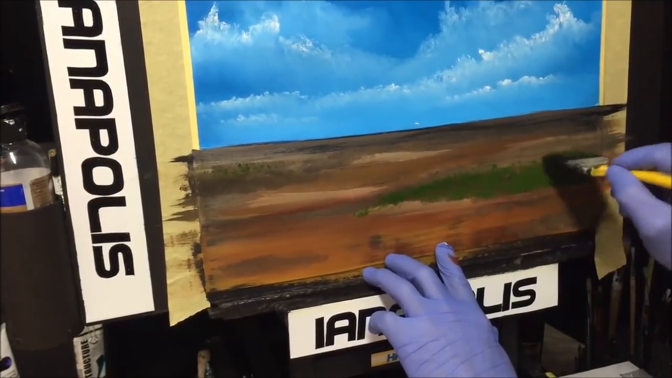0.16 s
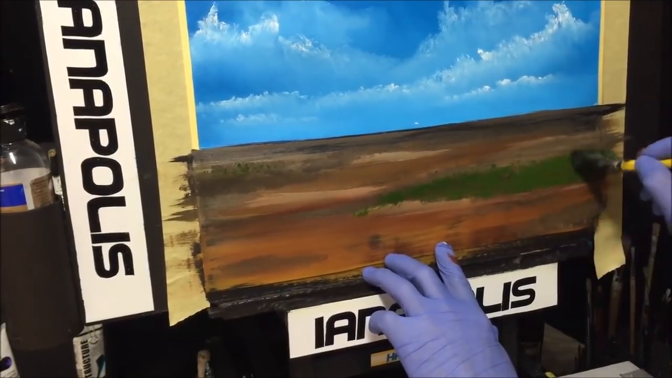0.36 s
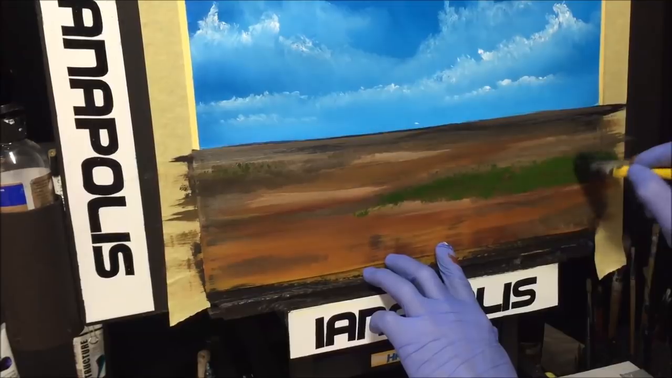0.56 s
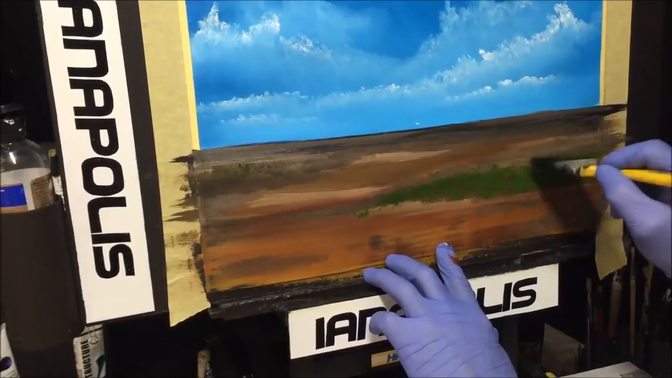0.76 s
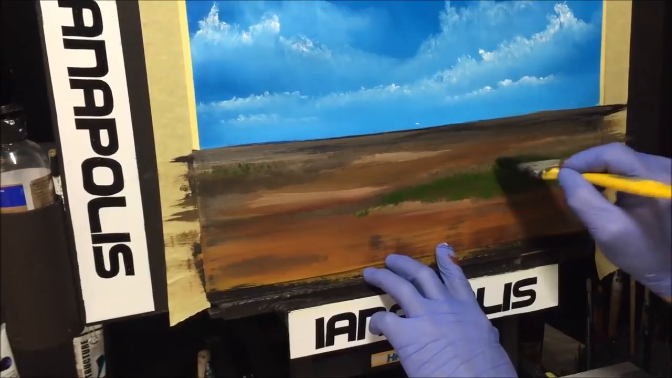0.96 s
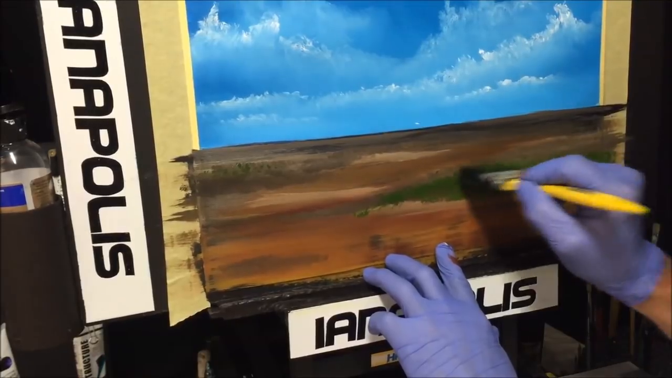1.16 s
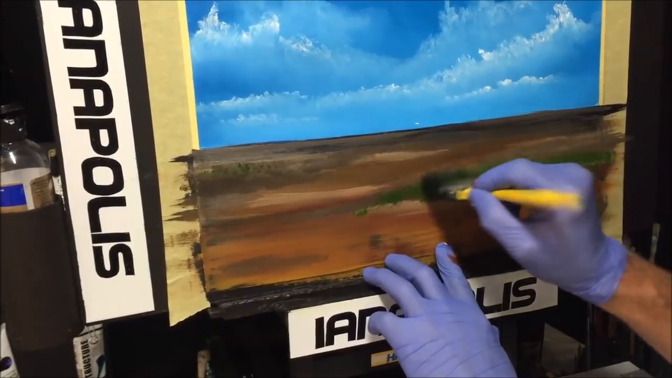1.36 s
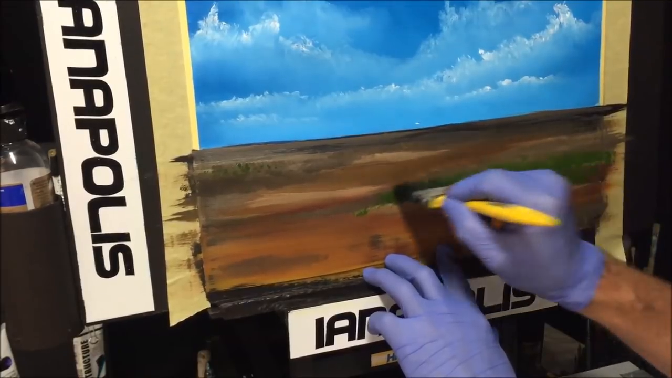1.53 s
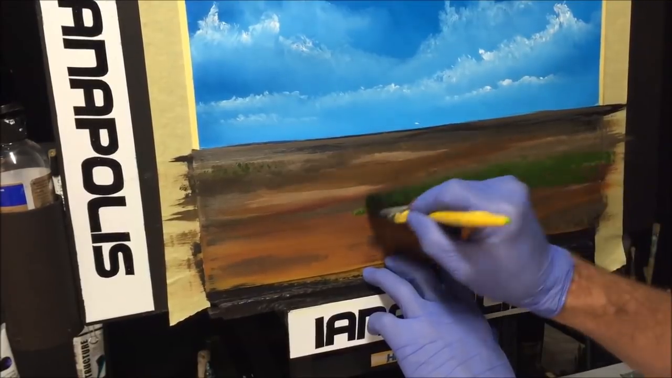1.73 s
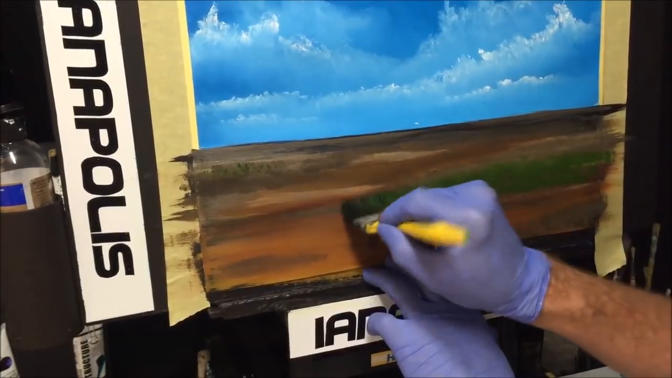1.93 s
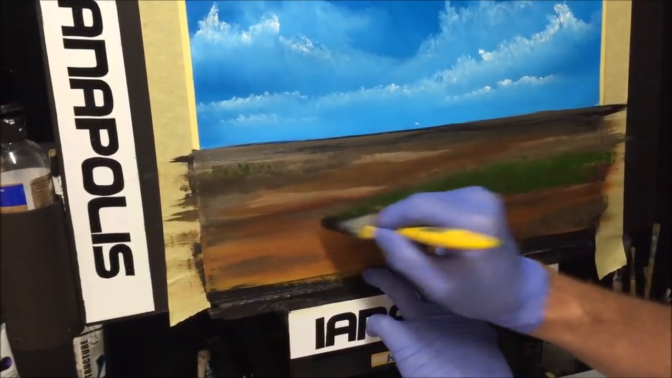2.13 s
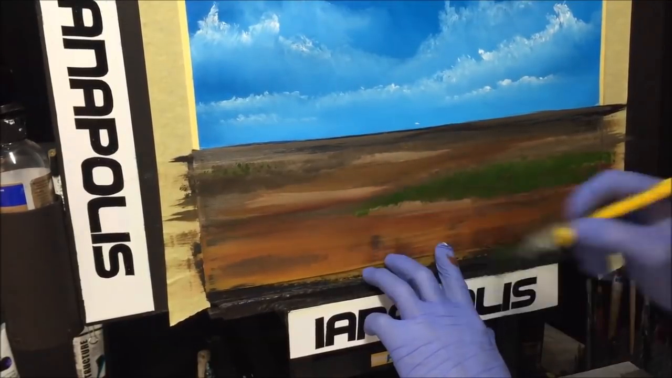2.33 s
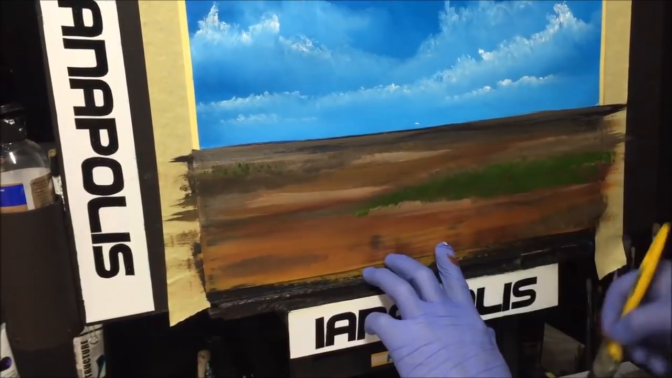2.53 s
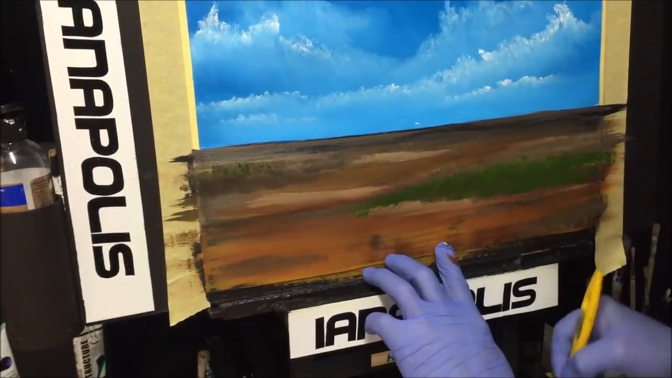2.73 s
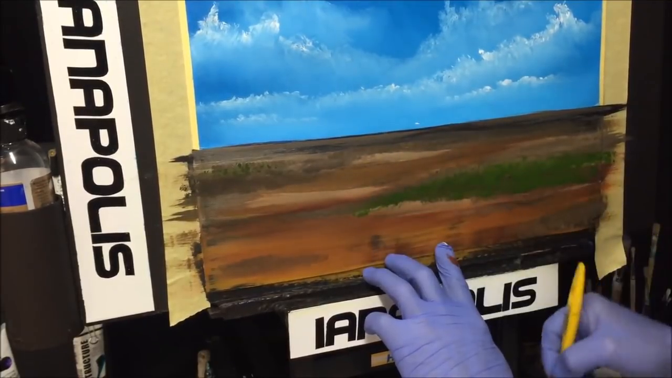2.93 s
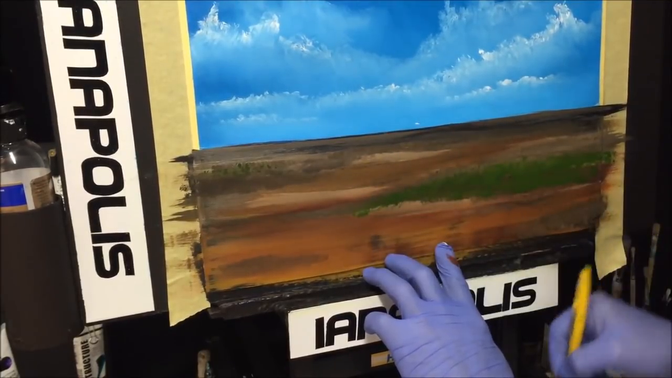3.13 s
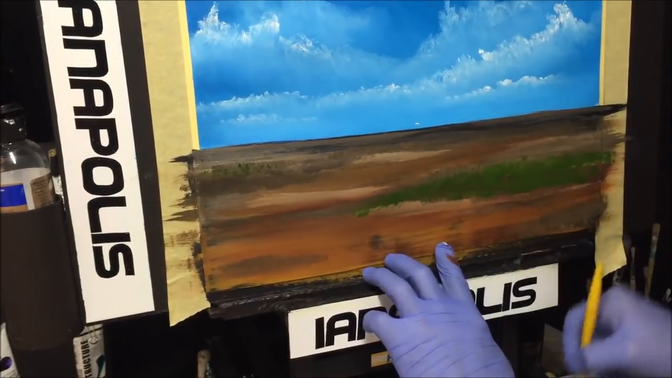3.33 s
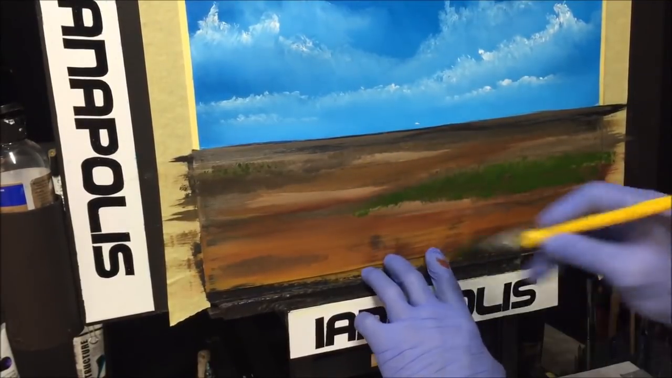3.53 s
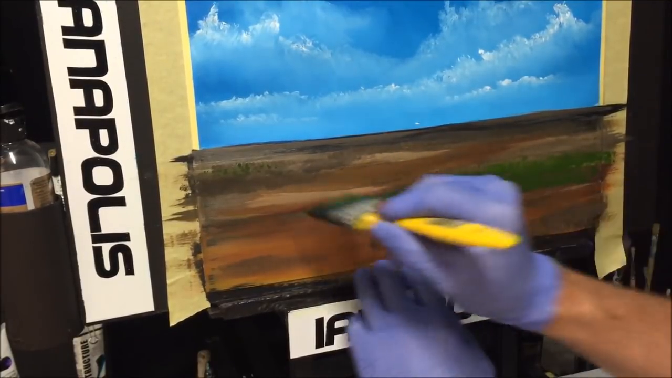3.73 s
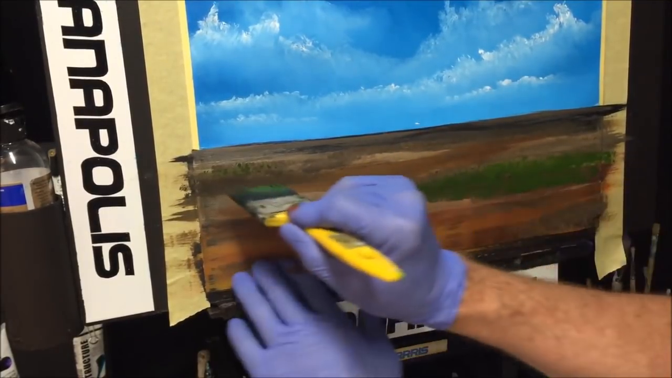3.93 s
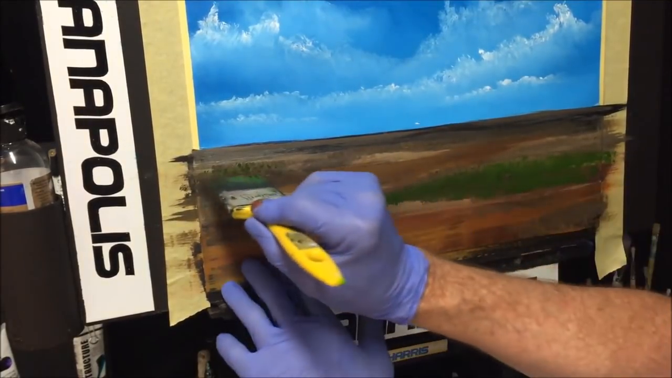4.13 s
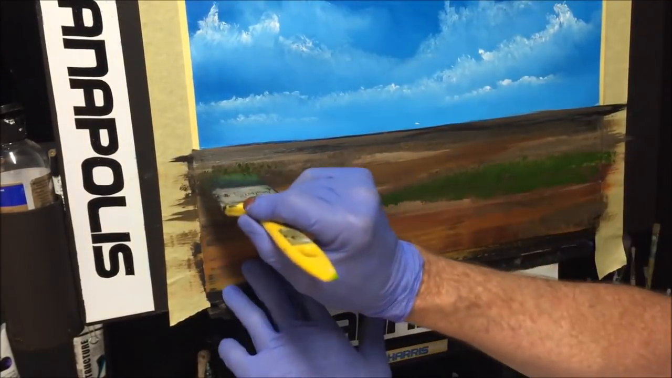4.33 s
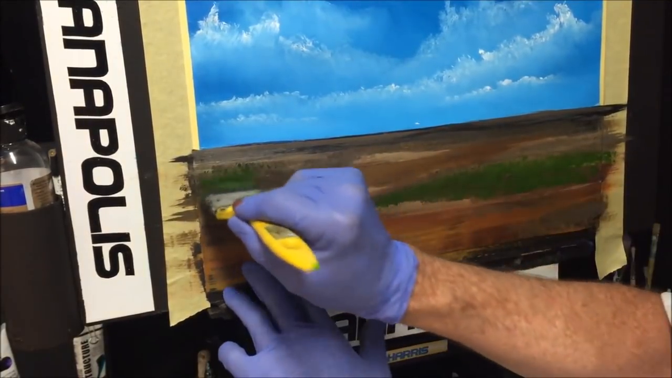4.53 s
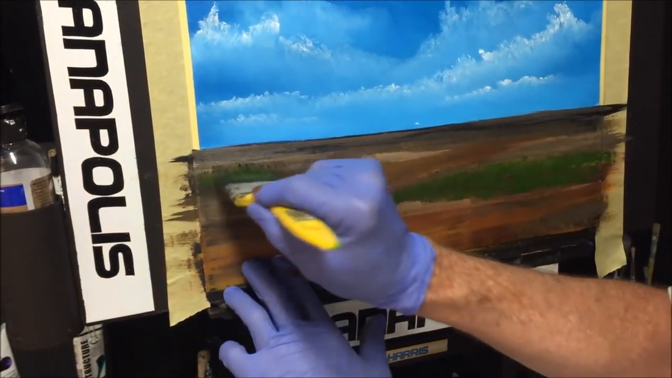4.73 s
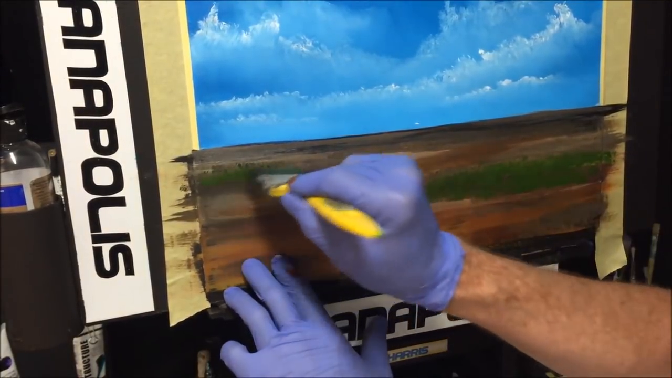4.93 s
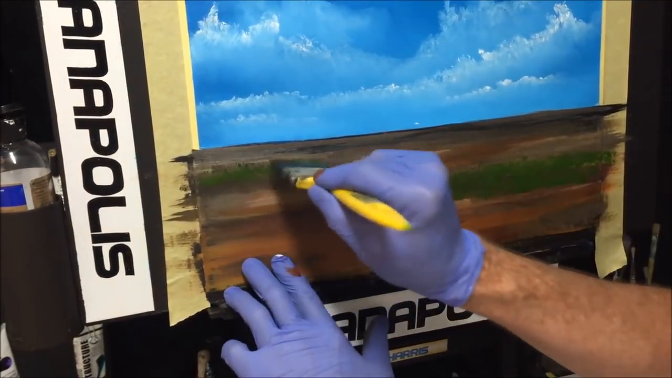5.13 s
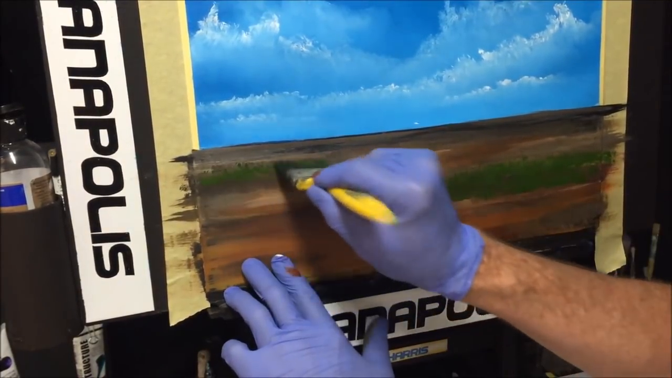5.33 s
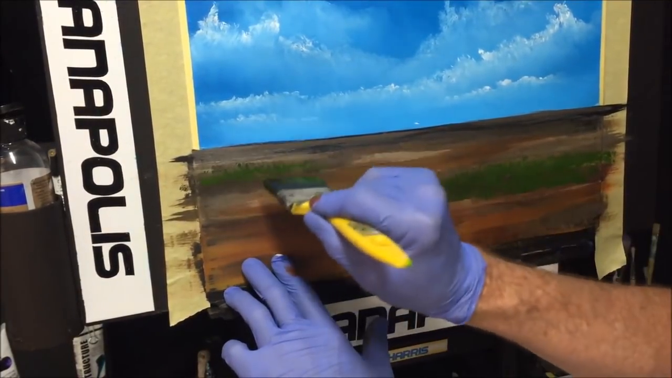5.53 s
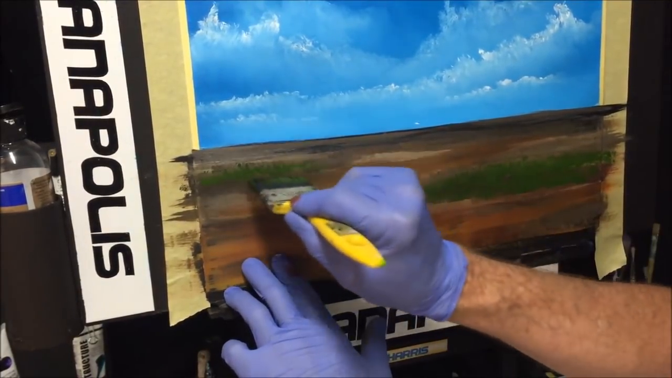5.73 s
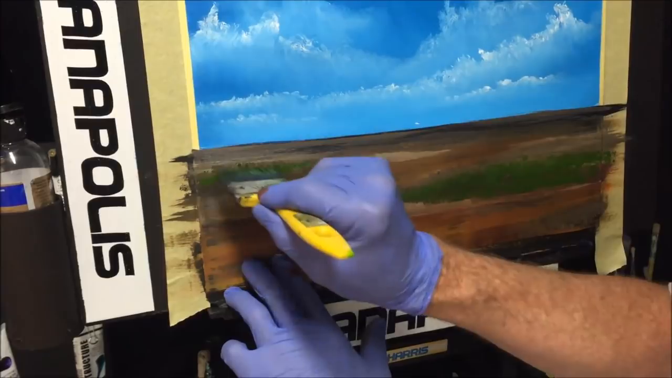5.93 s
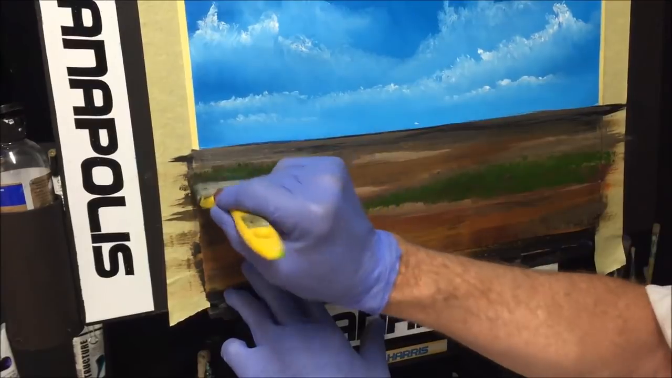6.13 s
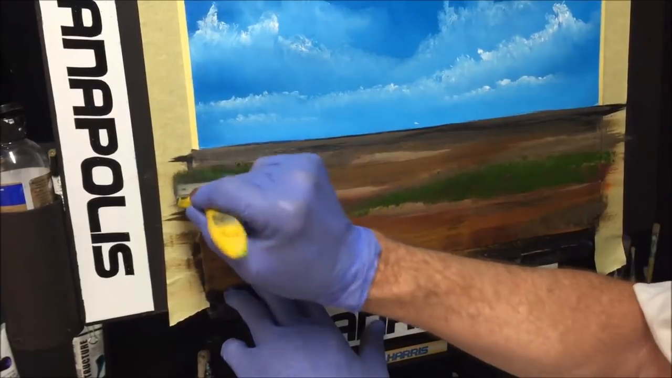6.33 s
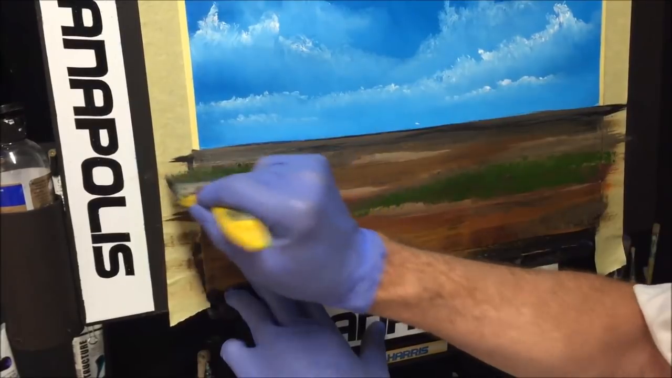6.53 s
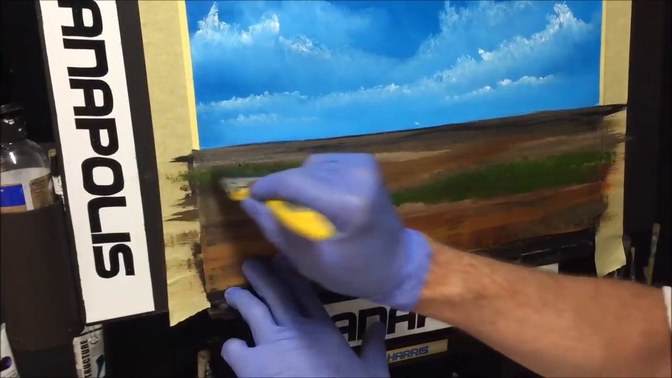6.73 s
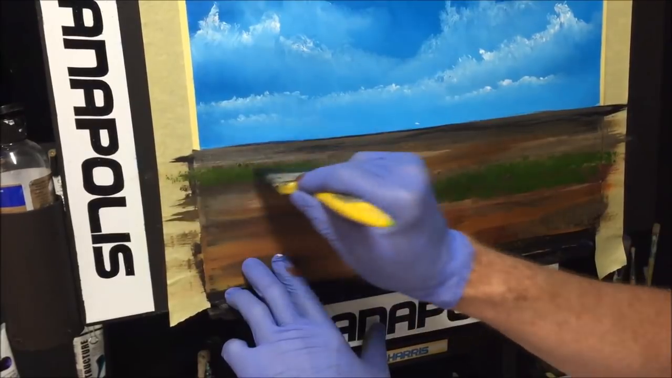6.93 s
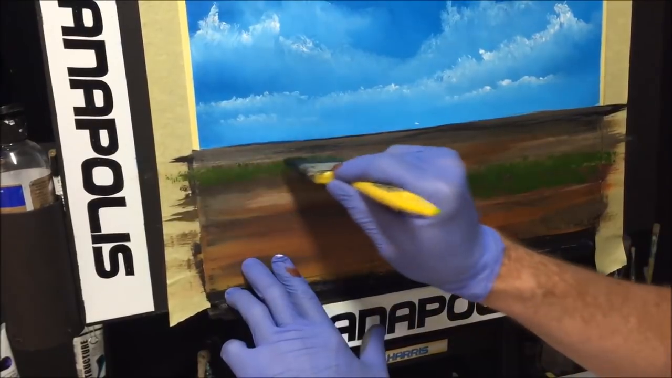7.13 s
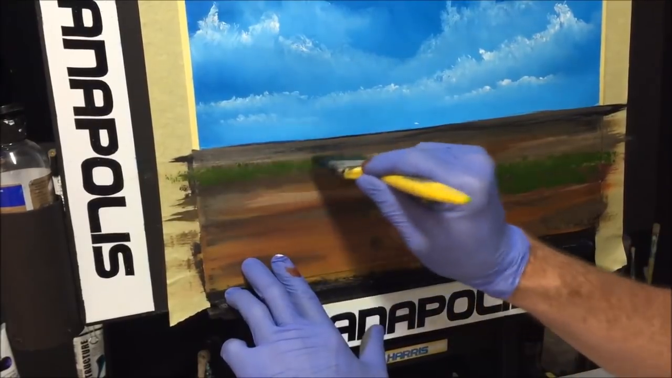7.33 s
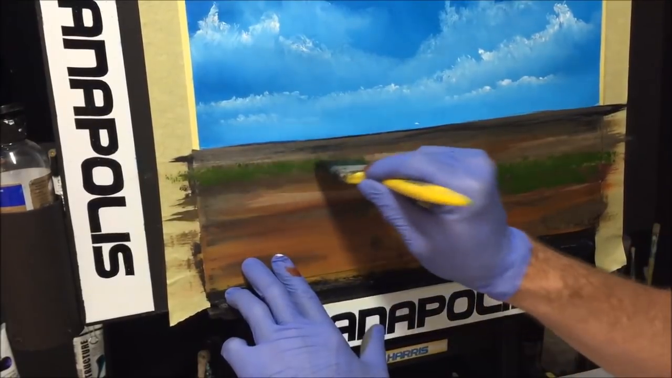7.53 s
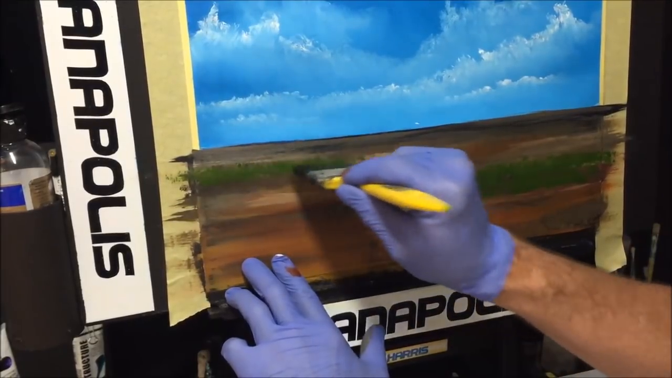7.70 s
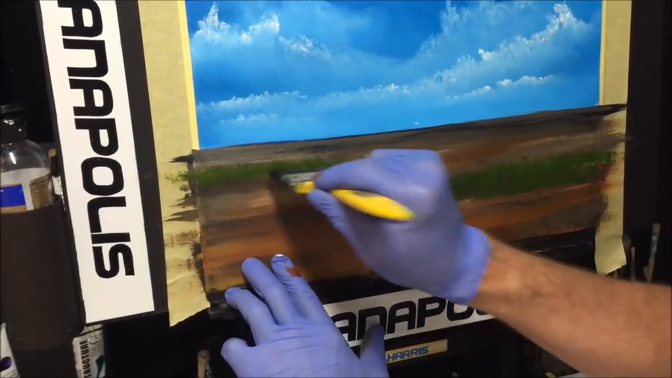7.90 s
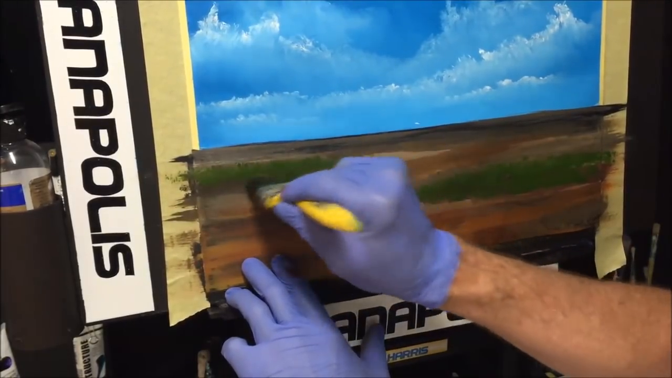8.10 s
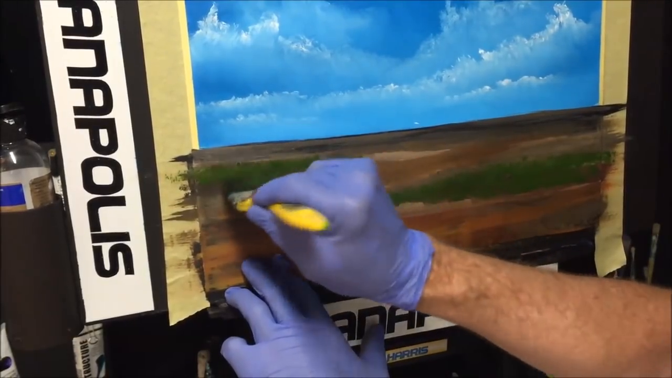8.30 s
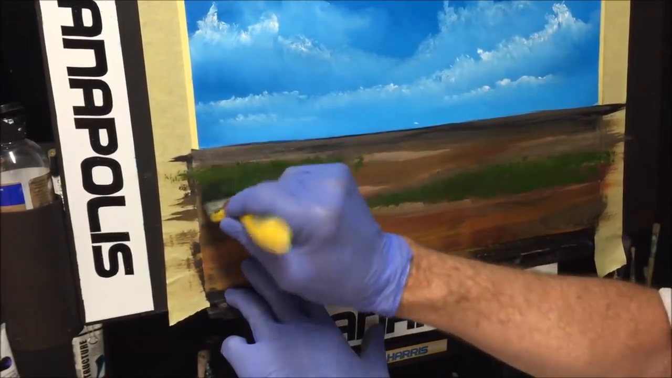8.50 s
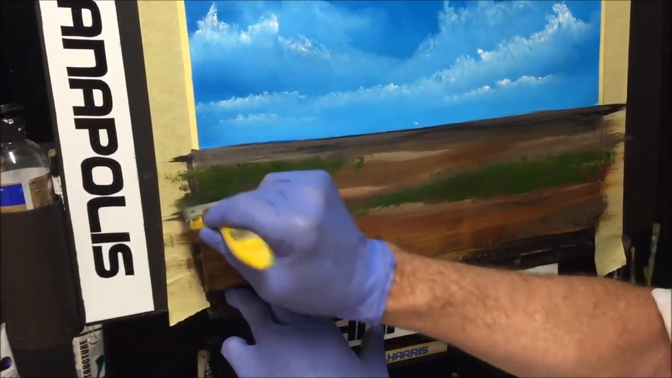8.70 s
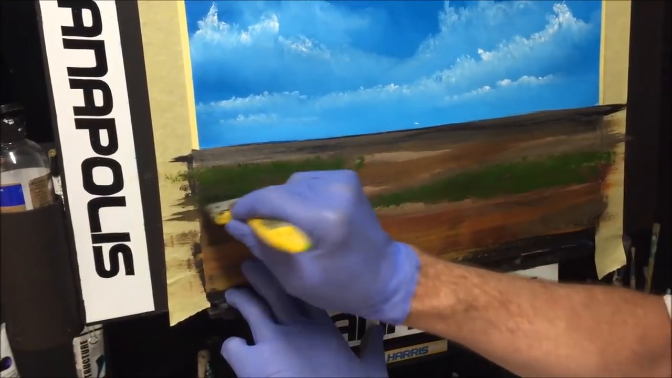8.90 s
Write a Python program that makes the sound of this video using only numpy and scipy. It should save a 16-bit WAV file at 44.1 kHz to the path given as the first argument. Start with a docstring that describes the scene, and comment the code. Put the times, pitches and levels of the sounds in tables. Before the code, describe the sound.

A stiff bristle brush stabs wet paint onto a stretched canvas nearly six times a second, each tap a soft thump with a scratchy crunch. The tapping stops for four increasingly loud dabs on a palette and a faint slide of a rubber glove. A longer run of stabs follows, with one short pause. It is all close to the microphone in a small studio, with scattered ticks and a faint low hum.

```python
"""A stiff bristle brush stabs paint onto a stretched canvas, close by in a small studio, nearly six
times a second. In each stab the tips scratch, the tuft buckles and thumps the cloth, then peels out
of the wet paint. Next, four dabs on the palette reload the brush and a gloved hand slides along the
canvas. Then a longer run of stabs follows, with one short pause; late in it the easel rocks once.
The brush ticks and clicks here and there, and faint air and a low hum lie under it all."""
import sys
import numpy as np
from scipy import signal
from scipy.fft import rfft, irfft, next_fast_len
from scipy.io import wavfile
from scipy.ndimage import uniform_filter1d

SR = 44100
rng = np.random.default_rng(int(sys.argv[2]) if len(sys.argv) > 2 else 0)


def digitize_waveform(pressure):
    """Quantize a signal to 16-bit integers and store it at the path in sys.argv[1].

    Rows of a 2-D input are taken as channels; values are limited to [-1, 1].
    """
    field = np.atleast_2d(pressure).T
    bounded = np.clip(field, -1, 1)
    quanta = np.round(bounded * 32767).astype(np.int16)
    wavfile.write(sys.argv[1], SR, quanta)


N = 399546
TIME = np.arange(N) / SR

# Levels in all tables are relative: each source adds its own gain.
# stabs on the canvas: start_s, thump_db, crunch_db
STABS = [(0.133, -27.5, -39.5), (0.3042, -24, -38), (0.4663, -31.5, -37.5), (0.6268, -36, -36.5),
         (0.797, -29, -37), (0.97, -32, -40), (1.135, -31.5, -37), (1.3094, -29.5, -39),
         (1.4859, -31.5, -41), (1.667, -30.5, -39.5), (1.8433, -38, -39.5), (2.0142, -34.5, -37),
         (2.18, -38, -31), (4.5546, -31.5, -28), (4.7653, -36, -35), (4.9402, -26.5, -34.5),
         (5.1257, -23, -31.5), (5.3, -23.5, -26.5), (5.467, -24, -30), (6.1981, -29.5, -29),
         (6.4017, -26.5, -31), (6.583, -28, -33.5), (6.7833, -24, -30), (6.9671, -22, -31),
         (7.1513, -26.5, -31), (7.3334, -27.5, -35), (7.51, -28, -33), (7.6878, -28.5, -32),
         (7.867, -31.5, -34), (8.058, -24, -29.5), (8.2332, -27, -28.5), (8.4109, -32, -30),
         (8.5862, -32, -29.5), (8.76, -32, -32.5), (8.9596, -29.5, -31)]
# dabs on the palette: start_s, time_in_paint_s, thump_db, crunch_db, peel_db
DABS = [(2.8107, 0.1, -34, -40.5, -50), (3.0214, 0.083, -24, -36, -50.5),
        (3.2137, 0.076, -21.5, -33, -50.5), (3.3945, 0.074, -18.5, -25.5, -52.5)]
# tone of bristles scraping the weave: pitch_hz, level_db
SCRATCH_TONE = [(500, 8), (1100, -13.5), (1500, 4.5), (2000, -1), (2700, -0.5), (3800, -16), (6500, -17.5),
                (15000, -35)]
# bright hiss of the palette paint and of the ticks: pitch_hz, level_db
HISS_TONE = [(600, -4), (2000, -4), (4500, 1), (8000, 0), (12000, -2), (15500, -2.5)]


def canvas_thumps(cloth_db, easel_db):
    """The cloth drums briefly at a pitch set by the spot that is hit; frame and easel ring on."""
    # the cloth's ringing notes: pitch_ratio, hit_at_right_db, hit_at_left_db, ring_s
    cloth_notes = [(0.599, -34, -10, 0.035), (1.002, -5.5, -3, 0.038), (1.122, -3, 1.5, 0.019),
                   (1.43, -8.5, -4, 0.026), (1.847, -6, -10.5, 0.033), (2.1, -29, -25, 0.0085),
                   (2.9, -18, -10.5, 0.024), (3.6, -16.5, -13, 0.018)]
    # low notes of frame and easel: pitch_hz, level_db, ring_s
    easel_notes = [(70.77, -26.5, 0.87), (83.3, -27.5, 0.65), (109.8, -31, 0.72), (155.5, -27.5, 0.33),
                   (222.6, -23, 0.28), (275.2, -12.5, 0.083), (350, -12.5, 0.1), (382.2, -21.5, 0.17)]
    right_hz, left_hz = 281.7, 357
    ratio, right_db, left_db, ring_s = np.transpose(cloth_notes)
    out = np.zeros(N)
    for start, thump_db, _ in STABS:
        left = place(start)
        pitch = np.interp(left, [0, 0.774], [right_hz, left_hz])  # levels off near the left edge
        hardness_db = .5 * (thump_db + 26) * np.log2(ratio)  # a harder stab favours higher notes
        notes_db = right_db + left * (left_db - right_db) + hardness_db
        cloth = strike(pitch * ratio, notes_db, ring_s, contact_s=.0012, vary_db=.8, detune=.006)
        easel = strike(*np.transpose(easel_notes), contact_s=0.014, vary_db=2.0, detune=0.025)
        push_db = 0.38 * thump_db - 2 * left  # varies less than the thump; weaker on the left
        add(out, start, from_db(thump_db + cloth_db) * cloth)
        add(out, start, from_db(push_db + easel_db) * easel)
    return out


def tips():
    """The tips land first and chirp as they stick and slip, then skid until the tuft buckles."""
    lead_s, upright_hz, slanted_hz = 0.017, 2730, 1566
    starts = np.transpose(STABS)[0]
    lean = slant(starts)
    touches = starts - lead_s * lean
    pitches = upright_hz * (slanted_hz / upright_hz) ** lean
    levels_db = -32.5 - 99 * (place(starts) - 0.44) ** 2  # loudest mid-canvas
    out, t = np.zeros(N), np.arange(SR // 30) / SR
    envelope = t / 0.0016 * np.exp(1 - t / 0.0023)
    for touch, pitch, db in zip(touches, pitches, levels_db):
        wobble = rms_one(uniform_filter1d(rng.standard_normal(len(t)), size=24))
        hz = pitch * (1 + 0.19 * wobble)
        add(out, touch, from_db(db) * envelope * np.sin(2 * np.pi * np.cumsum(hz) / SR))
    skid = holds(touches, starts, -54 + 15 * lean, edge_s=0.00071)
    return out + skid * grains(SCRATCH_TONE, spread_db=9.0)


def canvas_bristles():
    """The tuft buckles with a crunch, rustles while pressed and lets go of the paint."""
    # tones of the crunch at each edge and of the sticky paint: pitch_hz, level_db
    right_tone = [(400, -18), (1000, -12.5), (1600, 2), (2600, 3), (3800, -1), (5000, -6), (6400, -10),
                  (9000, -13.5), (15000, -29)]
    left_tone = [(400, 8.5), (1000, -5.5), (1500, -4), (2000, -12.5), (2900, -5), (5000, -16), (6300, -14),
                 (8000, -21.5), (9500, -19.5), (11000, -25.5), (15500, -26.5)]
    paint_tone = [(600, -14.5), (1100, 3.5), (1800, 15), (3000, 8), (5000, 4), (6400, 5), (8000, 2),
                  (12000, 0.5), (15500, -3.5)]
    starts, _, crunch_db = np.transpose(STABS)
    in_paint_s = np.interp(place(starts), [0, 1], [0.0786, 0.0538])  # shorter on the left
    lifts = starts + in_paint_s + 0.0026 * rng.standard_normal(len(starts))
    left = place(TIME)
    tuft = np.sqrt(1 - left) * grains(right_tone, spread_db=1.0)
    tuft += np.sqrt(left) * grains(left_tone, spread_db=5.5)
    crunch = from_db(7.0) * swells(starts - .0004, crunch_db, rise_s=0.00077, fall_s=0.0044) * tuft
    peel_db = -61 + 3 * slant(starts)
    pressed = from_db(-1.0 + 2.3 * left) * holds(starts, lifts, peel_db, edge_s=0.002)
    stickiness = from_db(10.5 - 2.2 * left)  # the paint is tackier on the right
    peel = stickiness * swells(lifts, peel_db, rise_s=0.0043, fall_s=0.008)
    return crunch + np.hypot(pressed, peel) * grains(paint_tone, spread_db=9)


def crush(delay_s=0.0043):
    """Hard stabs, mostly on the left, flatten the tuft against the weave just after it buckles."""
    starts, thump_db, _ = np.transpose(STABS)
    levels_db = -28 + 1.9 * (thump_db + 22.5)
    envelope = swells(starts + delay_s, levels_db, rise_s=0.0018, fall_s=0.0039)
    return place(TIME) * envelope * grains(SCRATCH_TONE, spread_db=1.5)


def palette():
    """The brush lands on a loose board, squashes into the paint and pulls out with a sticky hiss."""
    # the board's ringing notes: pitch_hz, level_db, ring_s
    board_notes = [(70.5, -25, 0.87), (97.2, -18, 0.5), (141, -22.5, 0.44), (215, -19, 0.14),
                   (236.3, -24, 0.38), (277, 4.5, 0.023), (286.5, -14, 0.26), (337, -18.5, 0.33),
                   (370, -11, 0.078), (437, 0.5, 0.015), (635, -13.5, 0.12), (990, -6, 0.022)]
    # tones of the rattling board and the buckling tuft: pitch_hz, level_db
    rattle_tone = [(150, -6), (240, 4.5), (320, 6), (400, -13), (520, -23), (640, -10.5), (1000, -26.5),
                   (2000, -22), (6000, -59)]
    crunch_tone = [(400, 10), (1000, 8), (2000, -2), (3500, -0.5), (6000, -3.5), (8000, -10), (12000, -14),
                   (15500, -23)]
    starts, in_paint_s, thump_db, crunch_db, peel_db = np.transpose(DABS)
    lifts = starts + in_paint_s
    knocks = np.zeros(N)
    for start, db in zip(starts, thump_db):
        knock = strike(*np.transpose(board_notes), contact_s=0.0013, vary_db=-0.5, detune=0.0097)
        add(knocks, start, from_db(db + 7.5) * knock)
    rattle = holds(starts + 0.0039, lifts, thump_db - 10.5, edge_s=0.0098)
    rattle *= grains(rattle_tone, spread_db=3.0)
    crunch = from_db(5) * swells(starts - .0005, crunch_db, rise_s=0.00078, fall_s=0.014)
    crunch *= grains(crunch_tone, spread_db=12)
    pressed = from_db(-4.0) * holds(starts, lifts, peel_db, edge_s=.005)
    peel = from_db(8.5) * swells(lifts, peel_db, rise_s=0.0077, fall_s=0.014)
    return knocks + rattle + crunch + np.hypot(pressed, peel) * grains(HISS_TONE, spread_db=0.5)


def brush_ticks(gap_s=0.0085, second_db=-10):
    """Short dry ticks and clicks of the brush, each with a weaker second tick."""
    # the ticks: start_s, level_db, treble_offset_db
    ticks = [(0.0277, -34, -15.5), (2.1264, -21.5, -24), (2.2921, -23, -25), (3.396, -14.5, -6),
             (3.498, -26.5, -20), (3.5412, -26.5, -11.5), (3.762, -30, -25), (3.828, -33.5, -3),
             (4.37, -42.5, -29), (4.8297, -32, -31), (5.014, -32, -36), (6.2686, -34.5, -30),
             (6.4748, -30.5, -30)]
    # tone of a tick's middle range: pitch_hz, level_db
    tick_tone = [(1300, 2), (1700, 3), (2500, 6.5), (3300, 1), (4800, -3.5), (6500, -0.5), (8000, -28),
                 (15000, -35)]
    second_ticks = np.add(ticks, [gap_s, second_db, 0])
    starts, db, treble_db = np.vstack([ticks, second_ticks]).T
    middle = swells(starts + 0.0017, db - 15.0, rise_s=0.00044, fall_s=0.0051)
    top = swells(starts + 0.00188, db + treble_db + 0.5, rise_s=0.00026, fall_s=0.0018)
    return middle * grains(tick_tone, spread_db=-10.5) + top * grains(HISS_TONE, spread_db=0)


def easel_rock(start_s=7.042, pitch_hz=68.2, level_db=-24.5, ring_s=0.48):
    """The easel rocks once under the resting hand."""
    out = np.zeros(N)
    note = np.transpose([(pitch_hz, level_db, ring_s)])
    add(out, start_s, strike(*note, contact_s=0.036, vary_db=1.5, detune=0))
    return out


def glove(middle_s=3.865, half_length_s=0.17, level_db=-56):
    """A rubber glove slides over the edge of the canvas in one smooth swell."""
    # tone of the rubbing: pitch_hz, level_db
    rub_tone = [(500, -10), (1000, -6), (1600, 0.5), (2700, -5), (4200, -6), (6000, -9), (10000, -11),
                (15500, -20)]
    swell = np.exp(-((TIME - middle_s) / half_length_s) ** 2)
    return from_db(level_db) * swell * grains(rub_tone, spread_db=1)


def studio(x):
    """Bright echoes off hand and easel, then the room rings; the moving arm alters them each stroke."""
    # the room's echo: pitch_hz, level_db, ring_s
    echo_bands = [(248, -5.5, 0.38), (480, -9.5, 0.29), (990, -6, 0.31), (1950, -10.5, 0.38),
                  (4000, -10, 0.34), (7940, -12, 0.33), (15200, -19, 0.16)]
    cuts = np.sort([0] + [round((row[0] - .03) * SR) for row in list(STABS) + list(DABS)] + [N])
    t, out = np.arange(SR // 3) / SR, np.zeros(N)
    white = rng.standard_normal((3, len(cuts) - 1, len(t)))
    close = np.exp(-t / 0.003) * (t > .0002)
    echoes = from_db(-9.5) * band(white[2] * close, 1780, 20000) / np.sqrt(np.sum(close ** 2))
    build_up = 1 - np.exp(-(t / 0.0041) ** 2)
    for k, hz in enumerate(250 * np.sqrt(2) ** np.arange(13)):  # half-octave bands
        decay = np.exp(-np.log(1000) * t / at_hz(echo_bands, hz, axis=2)) * build_up
        noise = band(white[k % 2], hz / 2 ** (1 / 4), hz * 2 ** (1 / 4))
        echoes += from_db(at_hz(echo_bands, hz)) * noise * decay / np.sqrt(np.sum(decay ** 2))
    for start, end, echo in zip(cuts, cuts[1:], echoes):
        add(out, start / SR, signal.fftconvolve(x[start:end], echo))
    return out


def background(hum_hz=98.1, beat_s=0.806, lull_s=4.22, beat_depth=0.63):
    """Still air and a faint hum that swells and fades, with steady octaves below and above it."""
    # tone of the room's air: pitch_hz, level_db
    air_tone = [(45, -9), (120, -2), (200, 1.5), (250, -16), (320, -2.5), (450, -13), (650, -19.5),
                (1000, -21.5), (2000, -23.5), (4000, -28.5), (8000, -33.5), (15500, -38.5)]
    phase = 2 * np.pi * hum_hz * TIME
    beat = 1 - beat_depth * np.cos(2 * np.pi * (TIME - lull_s) / beat_s)
    hum = from_db(-59) * beat * np.sin(phase)
    octaves = from_db(-63) * np.sin(phase / 2) + from_db(-71) * np.sin(2 * phase)
    return from_db(-60) * grains(air_tone, spread_db=0.0) + np.sqrt(2) * (hum + octaves)


def place(s):
    """Where the brush works at time s, from 0 right to 1 left."""
    # the path across the canvas: time_s, place_0_to_1
    path = [(0.1, 0.28), (0.55, 0.041), (2.2, 0.59), (4.5, 0.91), (5.4, 0.85), (6.4, 0.94), (7.5, 0.75),
            (8.55, 0.92), (9, 0.96)]
    return np.clip(np.interp(s, *np.transpose(path)), 0, 1)


def slant(s, steepest_place=0.68, width=0.38):
    """How far the wrist leans the brush at time s, from 0 upright to 1."""
    return np.exp(-((place(s) - steepest_place) / width) ** 2)


def strike(hz, db, ring_s, contact_s, vary_db, detune):
    """A soft blow rings notes that fade 60 dB in ring_s; each blow shifts strength and pitch a bit."""
    t, chance = np.arange(SR // 2) / SR, rng.standard_normal((2, len(hz)))
    strengths = from_db(db + vary_db * chance[0])
    hz = hz * (1 + detune * chance[1])
    rings = np.sin(2 * np.pi * hz[:, None] * t) * np.exp(-np.log(1000) * t / ring_s[:, None])
    return strengths @ rings * (1 - np.exp(-t / contact_s))


def grains(tone, spread_db):
    """Noise of countless tiny slips with the given tone; spread_db makes their sizes uneven."""
    size = next_fast_len(N)
    slips = rng.standard_normal(size) * from_db(spread_db * np.clip(rng.standard_normal(size), -2, 2))
    hz = np.arange(size // 2 + 1) * SR / size
    bass_cut = 1 / np.sqrt(1 + (tone[0][0] / (hz + 1)) ** 6)
    return rms_one(irfft(rfft(slips) * from_db(at_hz(tone, hz)) * bass_cut, size)[:N])


def swells(times, levels_db, rise_s, fall_s):
    """A loudness curve that grows to each moment and dies away after it."""
    out, t = np.zeros(N), np.arange(-SR // 8, SR // 4) / SR
    power = np.exp(2 * np.where(t < 0, t / rise_s, -t / fall_s))
    for s, db in zip(times, levels_db):
        skip = max(0, -round((s + t[0]) * SR))
        add(out, s + t[0], from_db(db) ** 2 * power[skip:])
    return np.sqrt(out)


def holds(starts, ends, levels_db, edge_s):
    """A loudness curve that stays up while the bristles are touching."""
    out = np.zeros(N)
    for start, end, db in zip(starts, ends, levels_db):
        add(out, start, np.full(max(1, round((end - start) * SR)), from_db(db)))
    smoothing = np.exp(-1 / (edge_s * SR))
    return signal.lfilter([1 - smoothing], [1, -smoothing], out + 1e-18)


def from_db(db):
    """Turn decibels into a gain."""
    return 10 ** (np.asarray(db) / 20)


def rms_one(x):
    """Scale to an average power of 1."""
    return x / np.sqrt(np.mean(x ** 2) + 1e-20)


def at_hz(points, hz, axis=1):
    """Read a table's column at any pitch, with octaves evenly spaced."""
    points = np.array(points)
    return np.interp(np.log(np.maximum(hz, 1)), np.log(points[:, 0]), points[:, axis])


def add(track, s, sound):
    """Mix a sound into a track from time s on."""
    i = max(0, round(s * SR))
    track[i:i + len(sound)] += sound[:max(0, N - i)]


def band(x, low_hz, high_hz):
    """Gently keep what lies between two pitches."""
    band_pass = signal.butter(2, [low_hz, min(high_hz, .45 * SR)], "band", fs=SR, output="sos")
    return signal.sosfilt(band_pass, x + 1e-18)


def scene():
    """Nearly mono, with a faint added stereo width in the treble."""
    brush = tips() + canvas_bristles() + crush() + brush_ticks()
    near = canvas_thumps(cloth_db=12.0, easel_db=-4.5) + easel_rock() + brush + palette() + glove()
    room = studio(near)
    sound = near + room + background()
    side = from_db(-21.5) * band(np.roll(room, SR // 1000), 3000, 15000)
    return np.array([sound + side, sound - side])


def record(dry):
    """The microphone drops the deepest bass; the highest treble is cut steeply."""
    low_hz, high_hz = 42, 16100
    thin = signal.sosfilt(signal.butter(4, low_hz, "high", fs=SR, output="sos"), dry)
    return signal.sosfilt(signal.ellip(10, .2, 80, high_hz, fs=SR, output="sos"), thin)


dry = scene()
out = record(dry)
digitize_waveform(out)
```